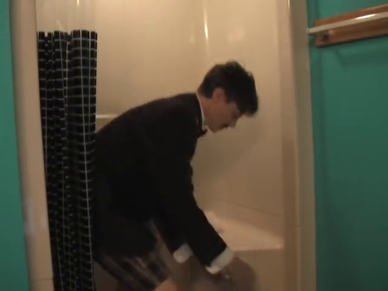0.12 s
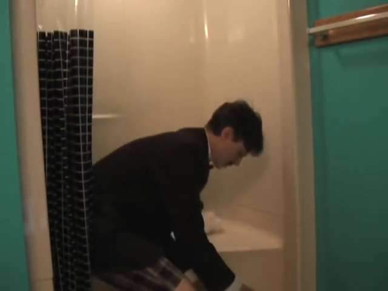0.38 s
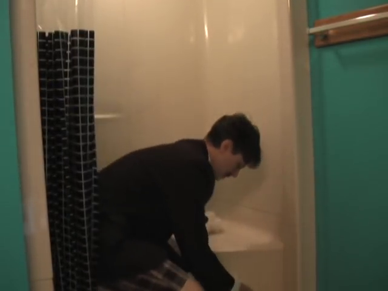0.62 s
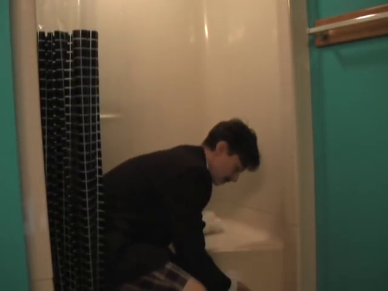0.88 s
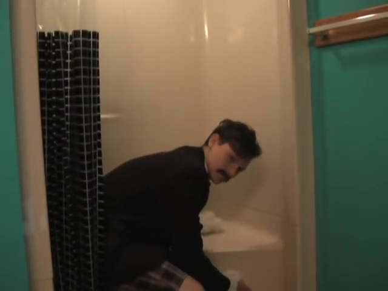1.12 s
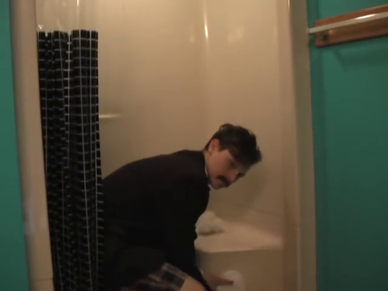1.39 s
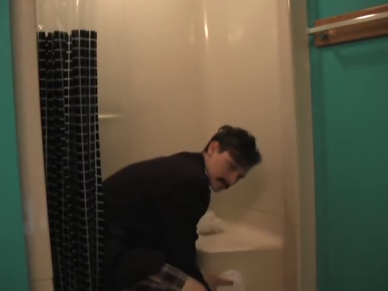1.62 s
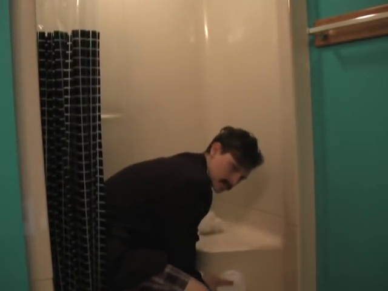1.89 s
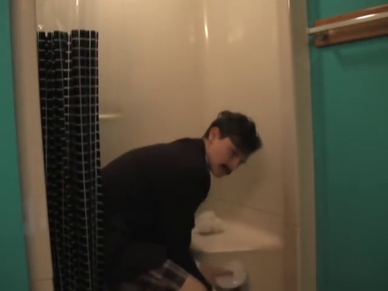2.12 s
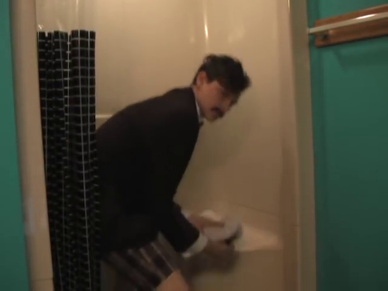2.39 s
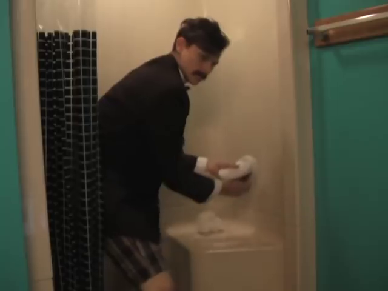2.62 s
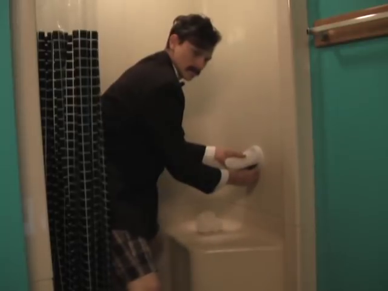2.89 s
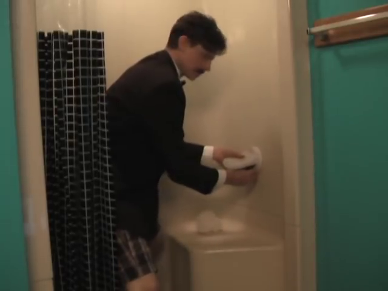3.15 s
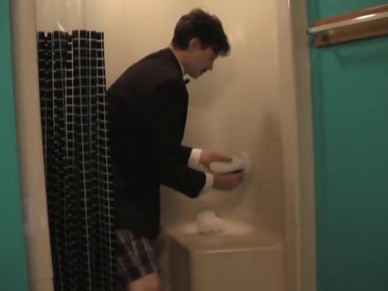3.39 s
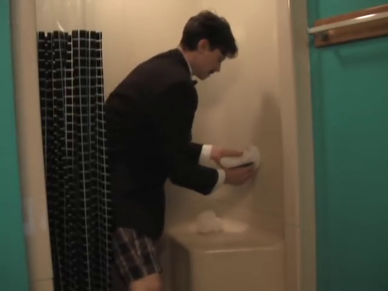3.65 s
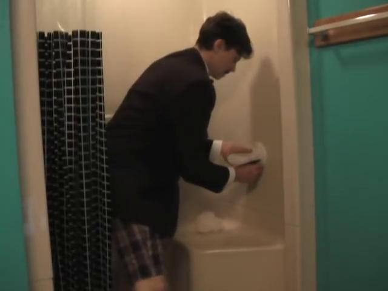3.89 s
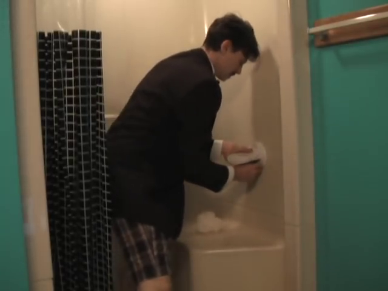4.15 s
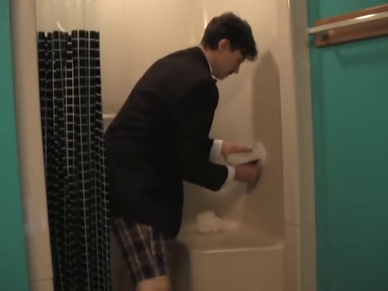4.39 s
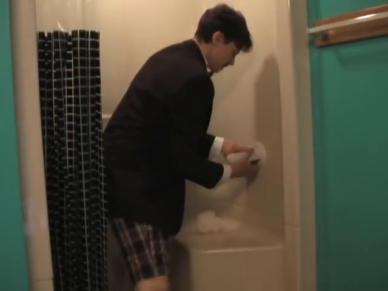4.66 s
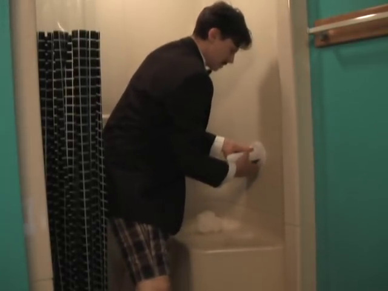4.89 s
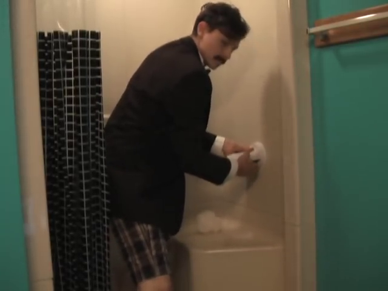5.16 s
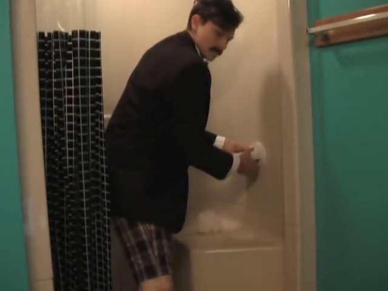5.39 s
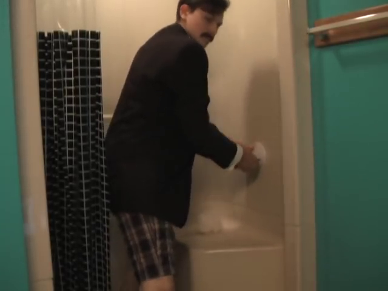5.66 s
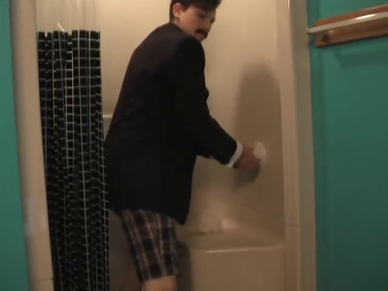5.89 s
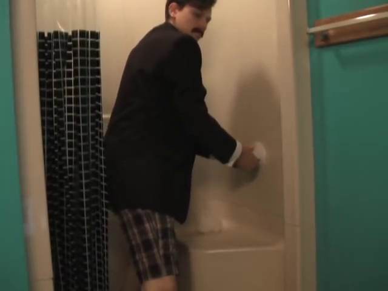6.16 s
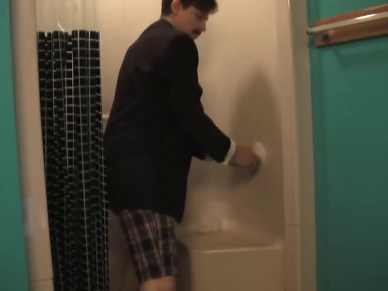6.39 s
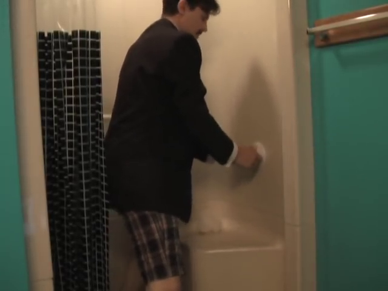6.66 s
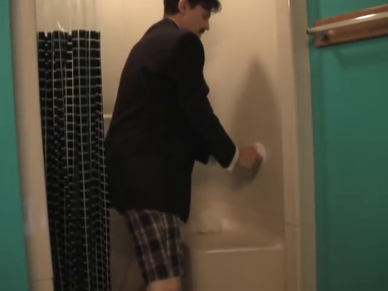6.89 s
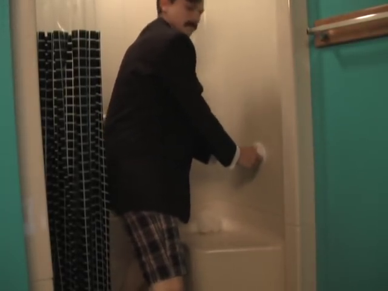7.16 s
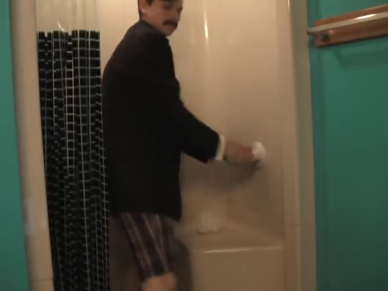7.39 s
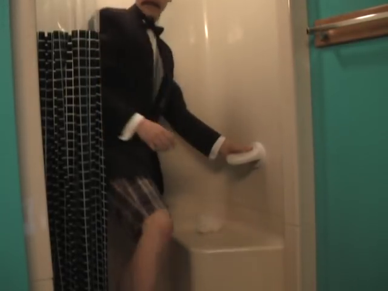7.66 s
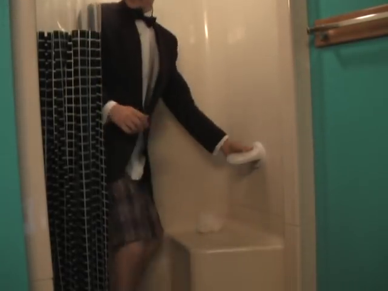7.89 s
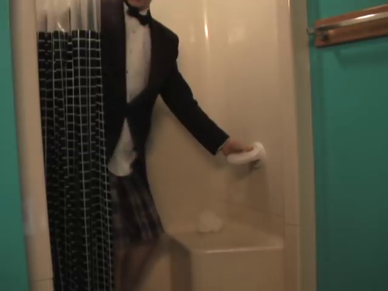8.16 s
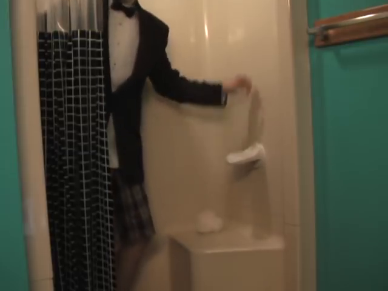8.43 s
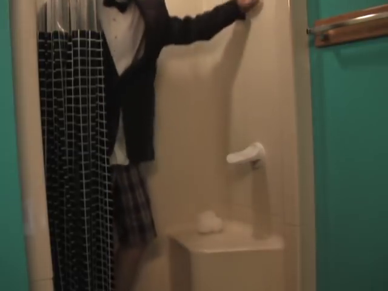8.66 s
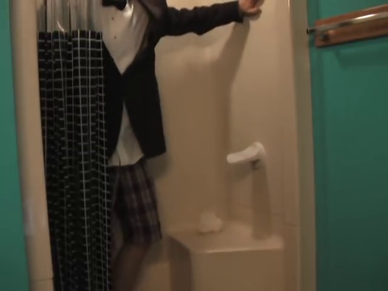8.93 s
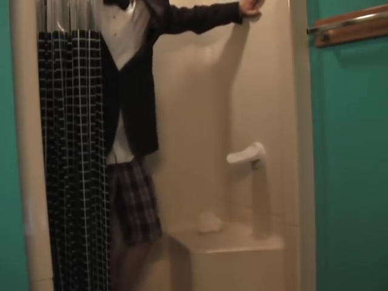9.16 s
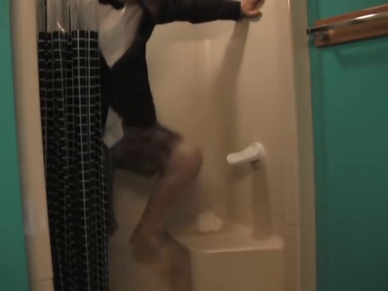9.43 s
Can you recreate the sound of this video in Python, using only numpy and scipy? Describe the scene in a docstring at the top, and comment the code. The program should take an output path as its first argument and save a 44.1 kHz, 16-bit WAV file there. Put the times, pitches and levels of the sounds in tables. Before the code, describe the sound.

In a small bathroom a ventilation fan hums low and hisses with a faint fast rattle. A hard plastic thing knocks loudly on a hollow shower panel, then come small scuffs and a squeak. Two heavy boomy thumps follow a second apart, a pause, a bright latching snap, soft rubbing, another double thump, and light footfalls. Close stereo microphones outside the stall.

```python
"""A fan hums and hisses in a small bathroom; then a plastic suction-cup foot rest is put down, pressed on, latched.
Fan: sine at twice the mains, noise in duct and stall resonances, rattle swelling once a shaft turn.
Handling: hands and bare feet knock and thump hollow panels (decaying modes plus shaped noise, low swings),
rubber scuffs (noise bursts) and squeaks (wavering sines), hard parts snap (short modes).
Two close microphones stand outside the stall."""
import sys
import numpy as np
from scipy import signal
from scipy.fft import rfft, irfft, next_fast_len
from scipy.io import wavfile
from scipy.ndimage import uniform_filter1d

SR = 44100
rng = np.random.default_rng(int(sys.argv[2]) if len(sys.argv) > 2 else 0)


def undo_db(level):
    """Turn decibels back into plain size, where 20 dB means ten times bigger."""
    steps = np.asarray(level, float) / 20
    return 10 ** steps


def master(y):
    """Save y as 16-bit WAV."""
    cut = np.clip(np.atleast_2d(y).T, -1, 1)
    pcm = np.round(cut * 32767)  # scale
    wavfile.write(sys.argv[1], SR, pcm.astype(np.int16))


N = 420713
T = np.arange(N) / SR


def curve(points, hz):
    """Straight lines on a log-frequency axis."""
    p = np.transpose(points)
    return np.interp(np.log(hz + 1), np.log(p[0] + 1), p[1])


def colour(x, gain):
    """Weights the spectrum by gain(Hz)."""
    size = next_fast_len(len(x))
    hz = np.arange(size // 2 + 1) * SR / size
    return irfft(rfft(x, size) * gain(hz), size)[:len(x)]


def resonance(hz, centre_hz, width_hz):
    """Resonance shape, 1 at the centre."""
    return 1 / (1 + (2 * (hz - centre_hz) / width_hz) ** 2)


def level(x, rms_db):
    """Sets the rms."""
    return x * undo_db(rms_db) / np.sqrt(np.mean(x ** 2))


def add(out, start_s, x):
    """Mixes x in from start_s."""
    i = int(start_s * SR)
    out[i:i + len(x)] += x[:N - i]


def fade(t, t60_s):
    """Exponential decay, 60 dB in t60_s."""
    return np.exp(-np.log(1000) * t / t60_s)


def walk(rate_hz):
    """Random wander, rms 1; rate_hz sets its speed."""
    k = int(SR / rate_hz)
    steps = np.repeat(rng.standard_normal(N // k + 1), k)
    smooth = uniform_filter1d(uniform_filter1d(steps, k), k)
    return level(smooth[:N], 0)


def fan_hum():
    """Motor hum at twice the mains, level wandering slowly."""
    rms_db, hum_hz = -46 + 1.2 * walk(4), 120
    return np.sqrt(2) * undo_db(rms_db) * np.sin(2 * np.pi * hum_hz * T)


# fan air spectrum: (frequency [Hz], relative level [dB])
AIR_SPECTRUM = [(15, -31), (30, -27.5), (45, -28.5), (70, -21.5), (110, -7), (150, -9.5), (250, -13),
                (312, -22), (400, -15), (774, -23.5), (1190, -34), (3000, -40.5), (6440, -54),
                (10400, -78.5), (13500, -106)]
# duct and stall resonances: (centre [Hz], width [Hz], lift [dB])
DUCT_RESONANCES = [(187.5, 8.3, 7), (220.8, 12.5, 11.5), (264.5, 43, 7), (338, 31, 3.5), (368, 22, 3),
                   (483.2, 23, 9), (620, 50, 0), (658.6, 15, 8), (991, 57, 13), (1064, 33, 13),
                   (1383, 270, 8.5)]
# centres of independently swelling ranges: (frequency [Hz])
EDDY_CENTRES_HZ = [150, 230, 350, 550, 900, 1600]


def fan_air():
    """Turbulent noise in duct and stall resonances; eddies swell neighbouring ranges independently."""
    def spectrum(hz):
        lift_db = sum(db * resonance(hz, centre, width) for centre, width, db in DUCT_RESONANCES)
        return undo_db(curve(AIR_SPECTRUM, hz) + lift_db)

    steady = colour(rng.standard_normal(N), spectrum)
    air = np.zeros(N)
    for one in np.eye(len(EDDY_CENTRES_HZ)):
        band = list(zip(EDDY_CENTRES_HZ, one))
        air += colour(steady, lambda hz: curve(band, hz)) * undo_db(2 * walk(8))
    return level(air, -46.5)


# fan housing resonances: (centre [Hz], width [Hz], relative level [dB])
HOUSING_RESONANCES = [(1704, 9.8, 5), (1910, 45, -1), (2286, 61, -4), (2761, 42, -1.5), (3470, 42, -15),
                      (3400, 5.7, -4.5), (4010, 17, -10), (4627, 55, -8.5), (4940, 32, -11.5),
                      (5250, 97, -15.5), (5630, 50, -11.5), (6240, 26, -12), (6500, 88, -14.5),
                      (6790, 88, -19.5), (7300, 50, -20.5), (7670, 33, -19), (7910, 59, -18),
                      (8500, 22, -17), (8790, 29, -22), (9300, 38, -32)]


def fan_rattle():
    """Rotor rubs 13 times a turn, hardest at one angle; noise bursts coloured by the housing."""
    shaft_hz, rubs_per_turn, start_turn = 26.086, 13, 0.04
    loud_turn, depth_db = 0.82, 11.5  # depth: drop on the opposite side
    gap_power = 2.3  # larger = shorter quiet gap in each turn
    count = int(N / SR * shaft_hz * rubs_per_turn)
    turn = np.arange(count) / rubs_per_turn
    at = ((turn + start_turn) / shaft_hz * SR).astype(int)
    rub_db = -depth_db * np.abs(np.sin(np.pi * (turn - loud_turn))) ** gap_power
    rub_db += 0.98 * rng.standard_normal(count)
    ticks = np.zeros(N)
    ticks[at[at < N]] = undo_db(rub_db)[at < N]
    rub = np.convolve(ticks, fade(T[:400], 0.011))[:N] * rng.standard_normal(N)

    def housing(hz):
        power = sum(undo_db(2 * db) * resonance(hz, centre, width) for centre, width, db in HOUSING_RESONANCES)
        return np.sqrt(power) * (hz > 1200)

    return level(colour(rub, housing), -67.5)


def fan():
    """Sums motor hum, turbulent air and rotor rattle."""
    return fan_hum() + fan_air() + fan_rattle()


# rubber and skin dragged on plastic: (time [s], rms before envelope [dB], length [s], centre [Hz])
SCUFF_EVENTS = [(1.212, -52, 0.012, 7800), (1.22, -53.5, 0.016, 5420), (1.683, -61, 0.024, 3120),
                (1.981, -64, 0.034, 6500), (2.018, -49.5, 0.019, 5570), (6.583, -61, 0.043, 3800),
                (6.629, -62, 0.029, 5300), (6.778, -58, 0.07, 3800), (6.795, -58.5, 0.045, 5900),
                (6.922, -61.5, 0.029, 4170), (7.549, -67.5, 0.027, 2970), (8.342, -56.5, 0.027, 5670)]


def scuffs():
    """Friction as grainy band noise that swells and dies."""
    out, t = np.zeros(N), T[:SR // 4]
    for start_s, rms_db, length_s, centre_hz in SCUFF_EVENTS:
        grain_db = 1.4 * level(uniform_filter1d(rng.standard_normal(len(t)), size=60), 0)
        grain = rng.standard_normal(len(t)) * undo_db(grain_db)

        def band(hz):
            narrow = resonance(hz, centre_hz, 0.2 * centre_hz)
            broad = resonance(hz, centre_hz, 0.91 * centre_hz)
            return (narrow + 0.23 * broad) * (hz > 900)

        half_s = length_s / 2
        envelope = np.clip(t / 0.024, 0, 1) * np.exp(-np.clip(t - half_s, 0, 1) / half_s)
        add(out, start_s, level(colour(grain, band), rms_db) * envelope)
    return out


# short squeaks of the cup: (time [s], level before flutter [dB], start pitch [Hz], hold [s])
SQUEAK_EVENTS = [(1.246, -38.5, 1412, 0.014), (2.041, -45.5, 1340, 0.013), (6.775, -47.5, 2145, 0.054),
                 (7.918, -50.5, 2320, 0.013)]


def squeaks():
    """Stick-slip tones: sagging, unsteady pitch and fluttering level."""
    out, t, sag_per_s = np.zeros(N), T[:SR // 8], 1.2
    for start_s, level_db, pitch_hz, hold_s in SQUEAK_EVENTS:
        waver = 1 - sag_per_s * t + 0.4 * uniform_filter1d(rng.standard_normal(len(t)), size=200)
        phase_rad = 2 * np.pi * np.cumsum(pitch_hz * waver) / SR
        envelope = np.clip(t / 0.0021, 0, 1) * np.exp(-np.clip(t - hold_s, 0, 1) / 0.02)
        flutter_db = 4 * level(uniform_filter1d(rng.standard_normal(len(t)), size=90), 0)
        add(out, start_s, undo_db(level_db + flutter_db) * envelope * np.sin(phase_rad))
    return out


# heels, palms, weight shifts on tub floor or wall: (time [s], envelope peak [dB], swing [Hz], length [s])
THUD_EVENTS = [(0.686, -31.5, 88.6, 0.21), (1.207, -48, 72, 0.044), (2.776, -24, 67.4, 0.055),
               (2.797, -21, 176.5, 0.039), (3.797, -16.5, 94.5, 0.033), (4.623, -38, 74.8, 0.037),
               (5.967, -40.5, 69.7, 0.084), (7.331, -49, 62, 0.089), (7.93, -41, 87.4, 0.05),
               (8.349, -21.5, 245, 0.086), (8.706, -31, 52.5, 0.11), (8.762, -37.5, 71.8, 0.11),
               (9.27, -39, 75, 0.05), (9.435, -45, 80, 0.04)]


def thuds():
    """Soft low swing of floor or whole wall panel: rounded sine burst, deepest bass rolled off."""
    out, t = np.zeros(N), T[:SR // 2]
    for (start_s, peak_db, swing_hz, length_s), phase in zip(THUD_EVENTS, rng.random(len(THUD_EVENTS))):
        x = t / (length_s / 4)  # 1 at the envelope peak
        swing = np.sin(2 * np.pi * (swing_hz * t + phase))
        add(out, start_s, undo_db(peak_db) * x * np.exp(1 - x) * swing)
    return colour(out, lambda hz: 1 / np.sqrt(1 + (56 / (hz + 1)) ** 8))


# hard plastic parts snapping together: (time [s], drive level [dB], brightness [dB/octave])
CLICK_EVENTS = [(0.677, -30.5, 9), (5.907, -21.5, -4.5), (5.915, -19, -6.5), (5.93, -21.5, 7.5),
                (9.501, -37.5, 1)]
# modes of the foot rest: (frequency [Hz], relative level [dB], t60 [s])
PART_MODES = [(1053, -9, 0.031), (1837, -3, 0.14), (2400, -18.5, 0.031), (2630, 5.5, 0.052),
              (3335, -2.5, 0.068), (3800, -11.5, 0.017), (4520, -9.5, 0.037), (5784, -4.5, 0.047),
              (6220, -2, 0.022), (7800, -6.5, 0.026), (9170, -18.5, 0.023)]


def clicks():
    """Sharp contact rings the foot rest's short modes; chatter of settling parts blurs them."""
    out, t = np.zeros(N), T[:SR // 8]
    hz, db, t60_s = np.transpose(PART_MODES)[:, :, None]
    chance = rng.random((len(CLICK_EVENTS), 2, len(PART_MODES), 1))
    for (start_s, drive_db, tilt_db), (phase, detune) in zip(CLICK_EVENTS, chance):
        mode_hz = hz * (1 + 0.048 * (detune - 0.5))
        ring = np.sin(2 * np.pi * (mode_hz * t + phase)) * fade(t, t60_s)
        ring *= 1 + 3.2 * uniform_filter1d(rng.standard_normal(ring.shape), size=24, axis=1)
        gain = undo_db(drive_db + db + tilt_db * np.log2(hz / 2600))
        add(out, start_s, (gain * ring).sum(axis=0) * np.clip(t / 0.0032, 0, 1))
    return out


# blows: (time [s], body drive [dB], boom re body [dB], clack re body [dB], crack re body [dB])
KNOCK_EVENTS = [(.679, -12.5, 1, -8.5, -8.5), (1.217, -45.5, 3.5, -11, -12), (1.252, -40, -6.5, 2.5, -34),
                (1.27, -44, -11, -7, -31), (1.305, -52, 4, 2, -20), (1.395, -60.5, 26.5, -15, -31),
                (1.692, -47.5, -3.5, -7, -10), (1.795, -69, 12, -16, -28), (2.039, -37, 4, -12, -11),
                (2.763, -36, -12, -3.5, -19.5), (2.771, -31, -28, -5, -21), (2.799, -40, 9, -4, -31),
                (3.009, -53.5, 16.5, -18, -22), (3.789, -29, -6.5, 5, -21.5), (3.795, -16.5, -2, -7, -13.5),
                (5.906, -24, -23, 3.5, -0.5), (5.93, -11.5, -21.5, -15.5, -15), (6.301, -36.5, 4, -6, -65),
                (6.78, -48.5, -4.5, 2, -8), (6.811, -30, -8, -22, -20), (8.328, -24, -12, 1.5, -38),
                (8.352, -20.5, -0.5, -8, -26), (8.712, -45, 14, -18, -32), (8.746, -47.5, 17, -27, -39),
                (9.272, -36.5, 8, -34, -27), (9.294, -49.5, 18, -23, -35), (9.501, -40.5, -25, 5, 3),
                (9.515, -35.5, -21, -2.5, -10.5)]
# strong panel and stall modes: (frequency [Hz], relative level [dB], undamped t60 [s])
PANEL_MODES = [(100.7, -13, 0.6), (114.9, -13, 0.35), (175.8, -4.5, 0.52), (230.3, -2.5, 0.33),
               (253.5, -6, 0.52), (290, -21.5, 0.79), (353, -7.5, 0.48), (395.7, -4, 0.41),
               (429.6, -8.5, 0.31), (453.3, -10.5, 0.49), (486.6, -2.5, 0.15), (566, -14.5, 0.32),
               (621, -33.5, 0.19), (706, -3, 0.21), (769.6, -4.5, 0.19), (851, -6, 0.33),
               (1037, -5.5, 0.25), (1294, -5, 0.16), (1414, -1, 0.2), (1626, -14.5, .15), (1954, -9.5, .12)]
# spectrum of the dense panel modes: (frequency [Hz], relative density [dB/Hz])
DENSE_SPECTRUM = [(71, -37), (120, -9.5), (239, -7), (300, -6), (404, 1.5), (598, -1), (1440, -18),
                  (1550, -10.5), (1870, -17), (2380, -23), (4580, -30), (5120, -28.5), (5950, -27.5),
                  (10400, -53.5), (13500, -76.5), (22000, -120)]
# zone curve points: (frequency [Hz])
ZONE_POINTS_HZ = [200, 400, 600, 1150, 2200]
# zone at each point: (index: 0 boom, 1 body, 2 clack, 3 crack)
ZONE_INDEX = [0, 1, 1, 2, 3]
# dense-mode noise in boom, body, clack, crack: (rms before envelope [dB])
DENSE_RMS_DB = [-5.5, -3.5, 1.5, -0.5]


def dense_envelopes(t, contact_s, free):
    """Boom, body, clack and crack envelopes: build-up over the contact, then damped decay."""
    rise = 1 - np.exp(-t / (contact_s + 0.0065))
    boom = rise * fade(t, 0.42 * free)
    body = rise * fade(t, 0.42 * free)
    room = undo_db(-21) * fade(t, 0.54)
    clack = np.clip(t / contact_s, 0, 1) * (fade(t, 0.13 * free) + room)
    crack = clack + undo_db(-4) * np.clip(t / 0.0016, 0, 1) * fade(t, 0.014)
    return boom, body, clack, crack


def knocks():
    """Blows load the panel over a contact time; strong modes ring as close pairs, dense modes as noise."""
    out, dense, t = np.zeros(N), np.zeros((4, N)), T[:SR // 2]
    hz, db, t60_s = np.transpose(PANEL_MODES + PANEL_MODES)[:, :, None]
    db = db + np.repeat([0, -4.5], len(PANEL_MODES))[:, None]  # weaker neighbour of each mode
    chance = rng.random((len(KNOCK_EVENTS), 3, len(hz), 1))
    for event, (phase, detune, spot) in zip(KNOCK_EVENTS, chance):
        start_s, body_db, boom_db, clack_db, crack_db = event
        zone_db = body_db + np.array([boom_db, 0, clack_db, crack_db])
        # dull blows: long contact
        contact_s = np.interp(crack_db, [-35, -10], [0.012, 0.002])
        # share of free ring time: a soft hand stays and damps, a hard part bounces off
        free = np.interp(crack_db, [-25, -17], [0.55, 0.95])
        drive_db = np.interp(np.log(hz), np.log(ZONE_POINTS_HZ), zone_db[ZONE_INDEX])
        gain = undo_db(drive_db + db + 5 * (spot - 0.5))  # struck spot favours some modes
        rise = 1 - np.exp(-t / (contact_s + 0.76 / hz))  # low modes build up slower
        mode_hz = hz * (1 + 0.0398 * (detune - 0.5))
        ring = np.sin(2 * np.pi * (mode_hz * t + phase)) * fade(t, t60_s * free) * rise
        # panel flexing makes each mode waver
        ring *= 1 + 14 * uniform_filter1d(rng.standard_normal(ring.shape), size=900, axis=1)
        add(out, start_s, (gain * ring).sum(axis=0))
        for line, one_db, envelope in zip(dense, zone_db, dense_envelopes(t, contact_s, free)):
            add(line, start_s, undo_db(one_db) * envelope)
    for line, one, rms_db in zip(dense, np.eye(4), DENSE_RMS_DB):
        zone = list(zip(ZONE_POINTS_HZ, one[ZONE_INDEX]))
        noise = colour(rng.standard_normal(N), lambda f: undo_db(curve(DENSE_SPECTRUM, f)) * curve(zone, f) ** 2)
        out += line * level(noise, rms_db)
    return out


# gain of the part opposite in the two microphones: (frequency [Hz], gain [dB])
SIDE_GAIN = [(60, -12.5), (200, -15), (500, -13), (1100, -6.5), (2300, -6), (5000, -6.5), (10000, -4)]
# blows from right of centre: (frequency [Hz], left minus right before side part [dB])
BLOW_BALANCE = [(60, 1.0), (190, -1.0), (580, -2.0), (1030, -2.5), (2300, -4.0), (5640, -2.5), (9960, -1.0)]


def scene():
    """Both microphones hear nearly the same; a small part from the walls enters with opposite sign."""
    blows = knocks() + clicks() + thuds() + scuffs() + squeaks()
    air = fan()
    # close blows differ less than diffuse air
    diffuse = (air + undo_db(-11) * blows) * walk(400)
    side = colour(diffuse, lambda hz: undo_db(curve(SIDE_GAIN, hz)))
    channels = []
    for sign in (1, -1):  # left, right
        panned = colour(blows, lambda hz: undo_db(sign * curve(BLOW_BALANCE, hz) / 2))
        channels.append(air + panned + sign * side)
    return np.array(channels)


def top_cut(x):
    """Nothing passes above the cut-off."""
    return signal.sosfilt(signal.butter(12, 10560, fs=SR, output="sos"), x)


def record(dry):
    """Microphones miss the deepest bass; peaks clip at full scale."""
    low_hz = 46.4
    wet = np.array([colour(x, lambda hz: 1 / np.sqrt(1 + (low_hz / (hz + 1)) ** 4)) for x in dry])
    mix = np.clip(wet, -1, 1)
    return top_cut(mix)


dry = scene()
out = record(dry)
master(out)
```